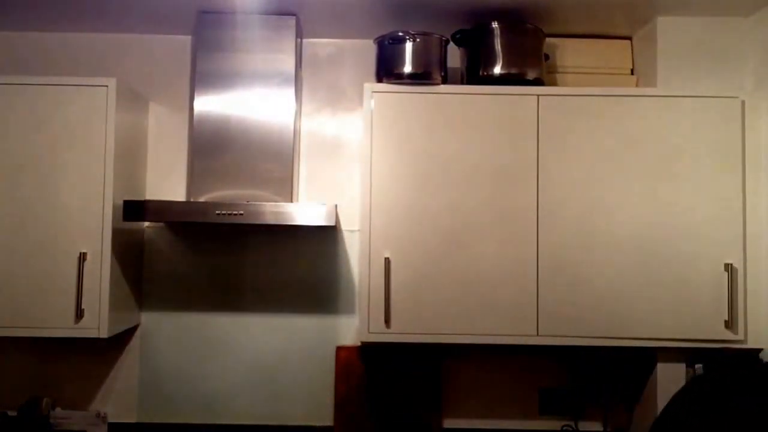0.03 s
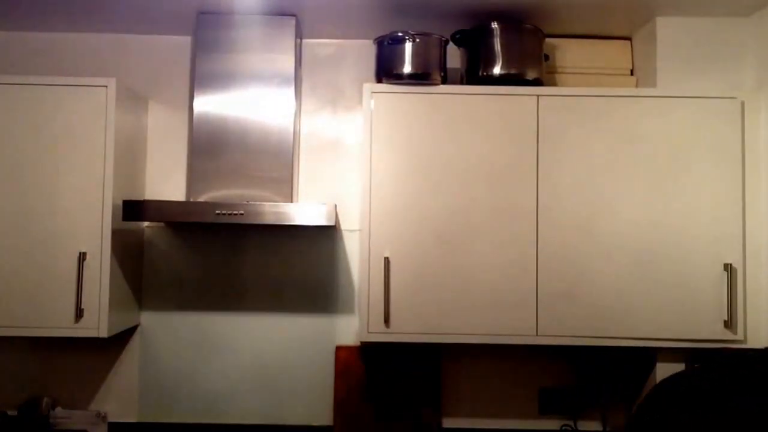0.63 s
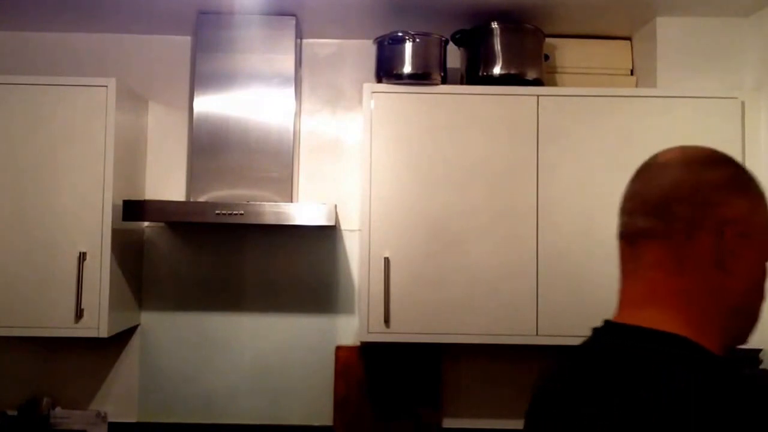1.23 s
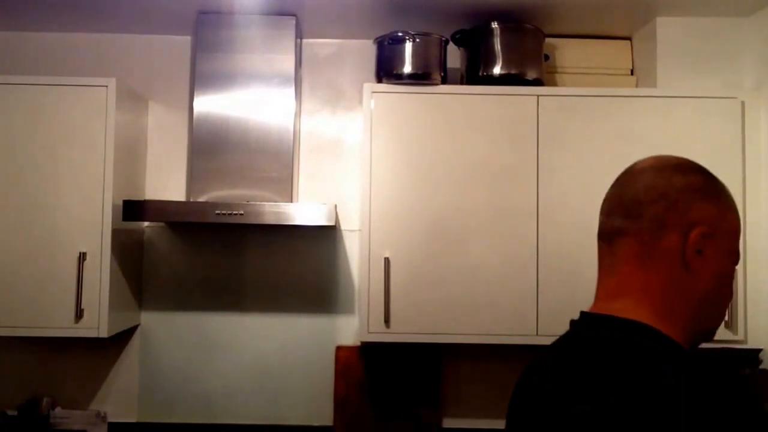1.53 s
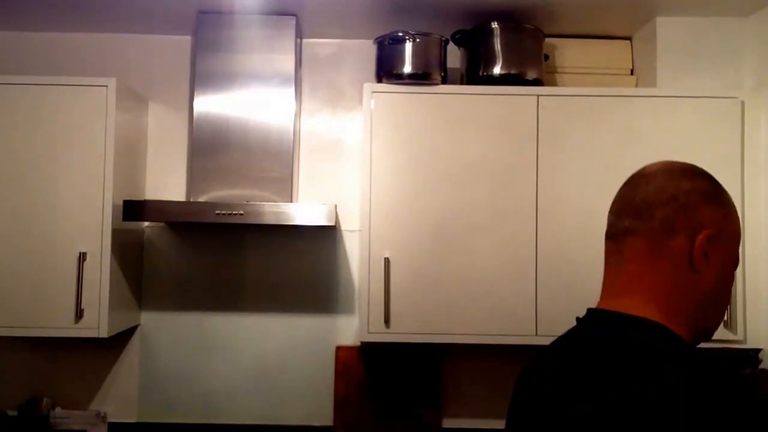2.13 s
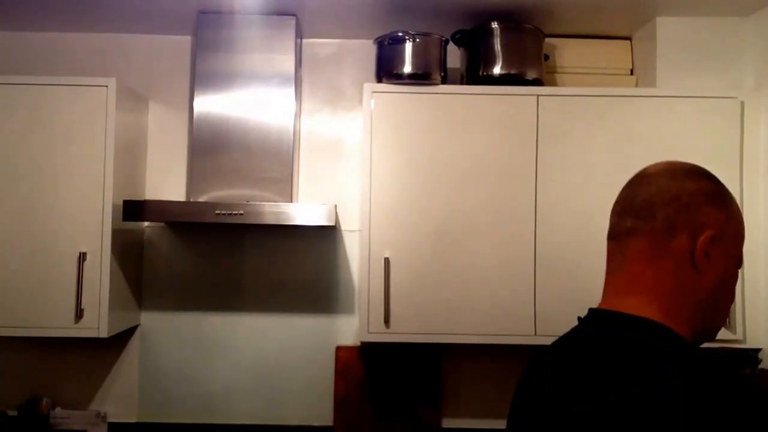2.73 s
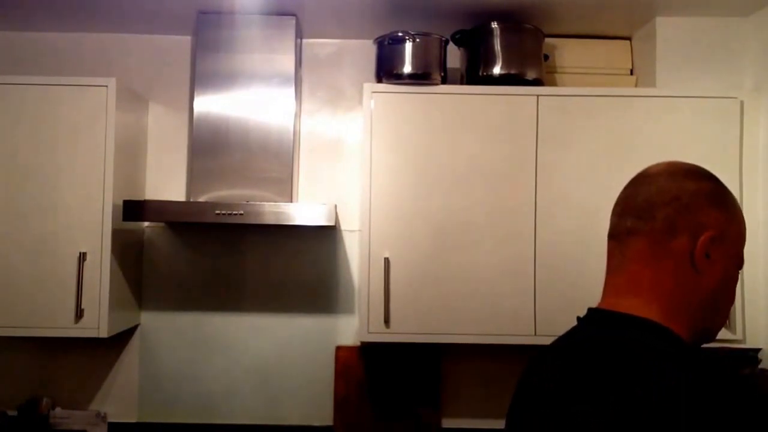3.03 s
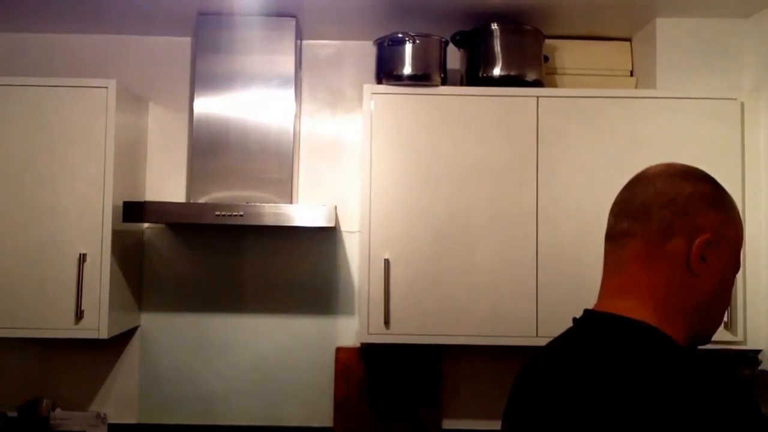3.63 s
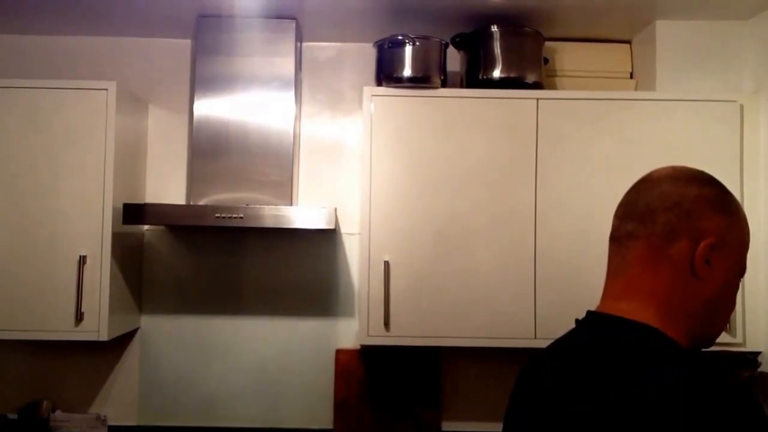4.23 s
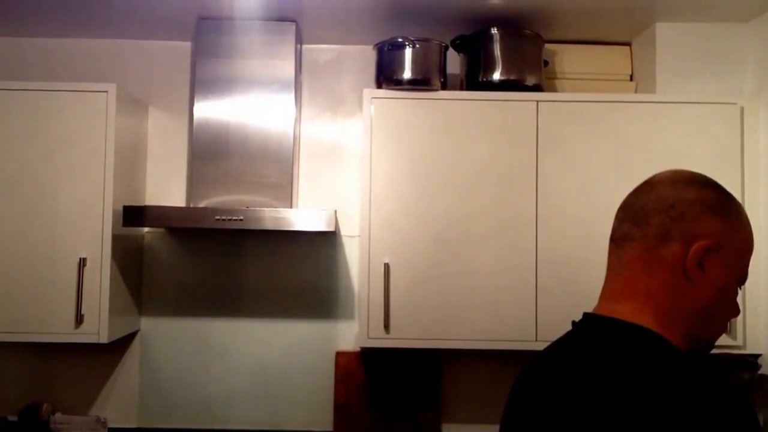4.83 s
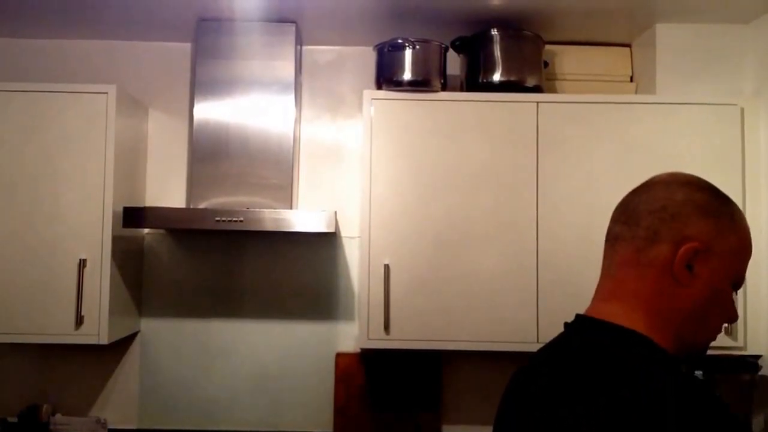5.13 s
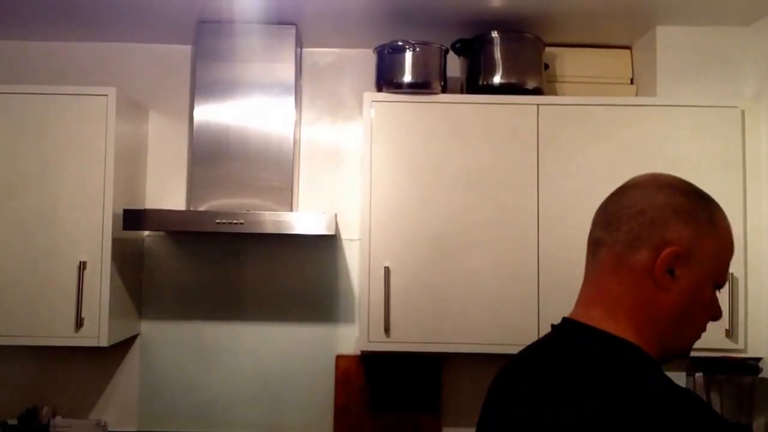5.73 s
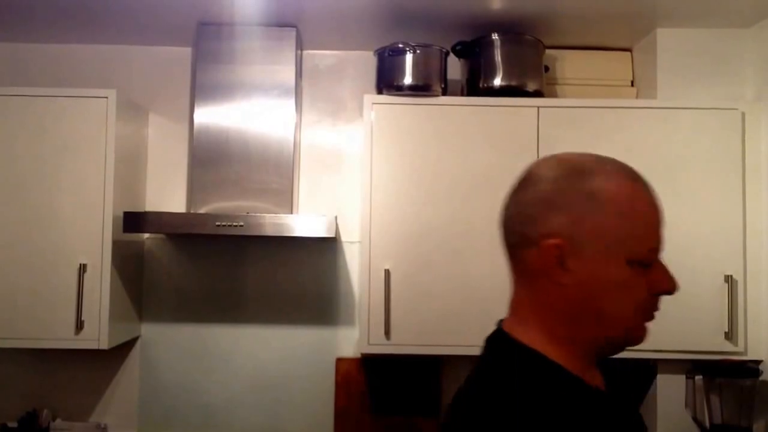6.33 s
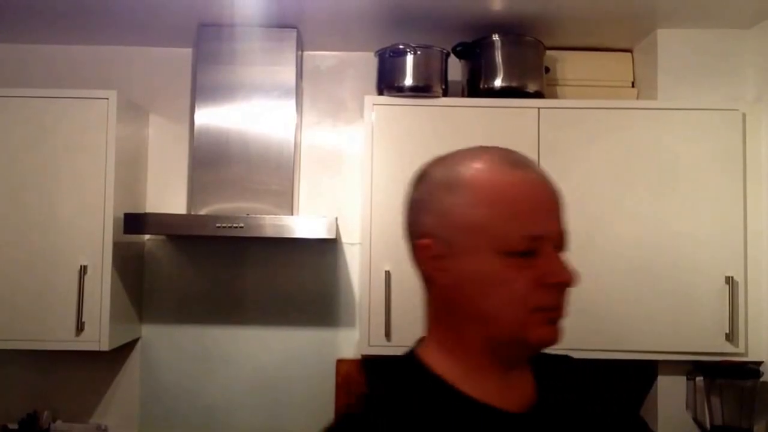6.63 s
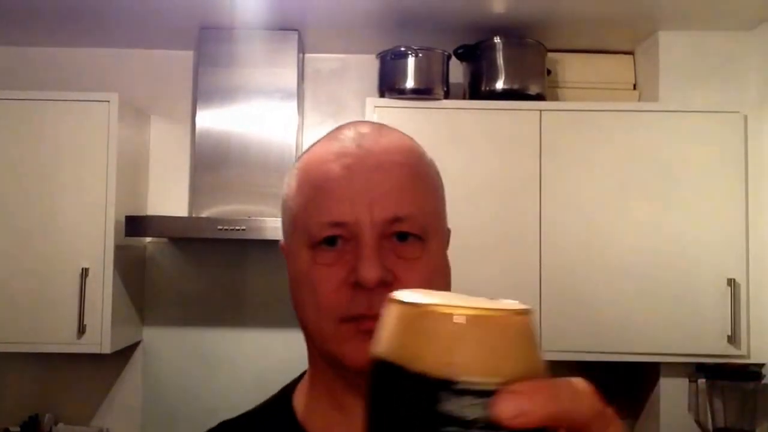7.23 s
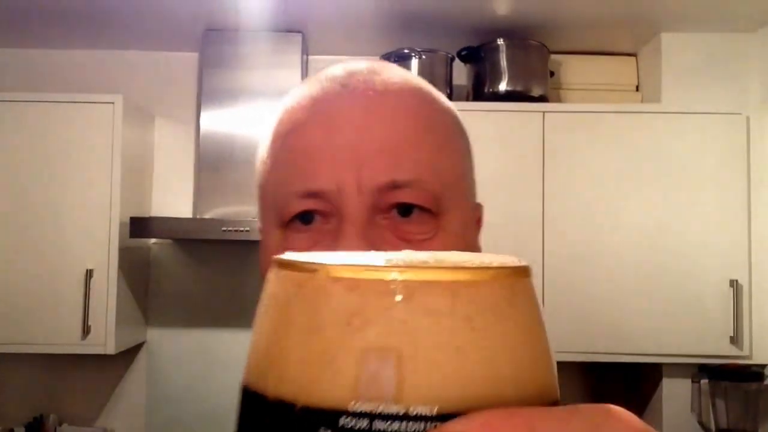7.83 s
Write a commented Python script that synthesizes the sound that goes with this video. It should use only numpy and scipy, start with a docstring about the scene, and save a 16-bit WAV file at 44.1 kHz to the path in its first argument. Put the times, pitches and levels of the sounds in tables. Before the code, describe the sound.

In a small, hard-walled kitchen, cutlery crashes about in a drawer, which knocks, leaving a faint metal tone over a few soft steps. A thin tin is worked at with light clicks and four snapping, scraping pulls. A utensil clinks three times against a glass, the drawer knocks and something is put down with a clatter. Rustling clothes and soft steps follow, all heard from a few metres away.

```python
"""In a small hard-walled kitchen, cutlery crashes about in a drawer, which knocks; a faint metal tone
hangs on over a few soft steps. From 2 s a thin tin is worked at with light clicks and four pulls that
snap, slip and let go. From 5.4 s a utensil clinks three times against a glass, the drawer knocks and
something is put down with a clatter. Rustling clothes and soft steps follow. All is heard from a few
metres off, mostly as room sound. Each hit is a burst of noise that rings a thing's own notes (modes)."""
import sys
import numpy as np
from scipy import signal
from scipy.fft import rfft, irfft
from scipy.io import wavfile

SR = 44100
rng = np.random.default_rng(int(sys.argv[2]) if len(sys.argv) > 2 else 0)


def unload_wav(signal):
    """Save mono or channel-first audio to the path in sys.argv[1] as 16-bit WAV at rate SR, clipped to [-1, 1]."""
    wavfile.write(
        sys.argv[1],
        SR,
        np.round(np.clip(np.atleast_2d(signal).T, -1, 1) * 32767).astype(np.int16),
    )


N = 356195
AGE = np.arange(SR) / SR  # seconds since a hit; each lasts one second
HZ = np.arange(SR // 2 + 1.0) + 1e-3  # the frequencies in a one-second sound

# Cutlery hits: start_s, bass_db, middle_db, treble_db, rattle_s, ring_share, favoured_hz
CUTLERY_HITS = [(0.007, -37, -33.5, -32, 0.28, 0.074, 12350.0),
                (0.032, -27, -23.5, -18, 0.069, 0.22, 9165.0),
                (0.062, -30.5, -28.5, -29, 0.24, 0.13, 1603.0),
                (0.221, -42.5, -35.5, -34, 0.14, 0.078, 9165.0), (0.41, -45, -40, -54.5, 0.17, 1, 11190.0),
                (0.505, -30.5, -28.5, -24, 0.14, 0.28, 900.0)]


def cutlery():
    """Pieces of metal crash together, rattle and ring."""
    # Tone of the clatter: frequency_hz, level_db
    colour = [(35, -60), (60, -30), (120, -17), (190, -13.5), (240, -10.5), (282, -9.5), (339, -3),
              (577, -8.5), (875, -14.5), (1830, -10.5), (2110, -5), (2700, -12), (3600, -13), (5000, -19),
              (9020, -15), (9670, -17), (15000, -12.5)]
    # Ringing notes: pitch_hz, level_db, width_hz
    modes = [(247, -8, 26), (343.5, -0.5, 30), (906, -1.5, 56), (1594, -5.5, 14), (2200, -8, 43),
             (5590, -10, 7), (6000, -8, 22), (8950, -9.5, 14), (9280, -9, 15), (10660, -1, 78),
             (11360, -4, 24), (12530, 0, 89), (13730, -2, 69), (14830, 1.5, 30)]
    room = kitchen(direct_share=0.17)
    return struck(CUTLERY_HITS, colour, modes, room, crack=0.08, grain_db=5.5, vary_db=3, favour_db=7)


def tin_pulls():
    """Each pull starts with a bright snap, slips twice with a duller scrape and lets go with a ring."""
    # Pulls: start_s, length_s, snap_db, slip_db, release_db, extra_treble_db, ring_freedom (0-1)
    pulls = [(2.493, 0.052, -73.5, -72.5, -74, -1, 0.05), (2.762, .08, -67, -55, -51.5, 6, 0.63),
             (3.554, .24, -42, -48, -44.5, 3.5, 0.66), (4.344, .183, -45, -44.5, -42, -0.5, 0.93)]
    # Stages of a pull: bass_offset_db, treble_offset_db, rattle_s, ring_weight, favoured_hz
    snap = (-24.5, 3, 0.04, 0.38, 5490)
    slip = (-19.5, -11.5, 0.14, 0.8, 2350)
    release = (-18.5, -7, 0.035, 1.16, 2460)
    # Tone of the thin metal: frequency_hz, level_db
    colour = [(100, -29), (450, -19.5), (900, 2.5), (1400, -4.5), (1750, -2.5), (2500, 8.5), (3200, 4),
              (4100, 3.5), (5000, 4), (6500, 5), (8000, -0.5), (15000, -4.5)]
    # Ringing notes: pitch_hz, level_db, width_hz
    modes = [(1190, -6, 29), (2121, -2.5, 31), (2346, -4, 35.5), (2427, 1, 50), (2610, -8.5, 120),
             (3780, -13, 70), (5490, -3, 38), (7340, -9.5, 108), (8960, -8, 71), (10970, -22, 50),
             (12200, -11, 48), (13900, -14, 150)]
    hits = []
    for start_s, length_s, snap_db, slip_db, release_db, bright_db, freedom in pulls:
        stages = [(snap, 0, snap_db, 0), (slip, 0.31, slip_db, bright_db),
                  (slip, 0.62, slip_db, bright_db), (release, 1, release_db, bright_db)]
        for (bass, treble, rattle_s, ring, hz), progress, db, extra_db in stages:
            hit_s = start_s + progress * length_s
            hits.append((hit_s, db + bass, db, db + treble + extra_db, rattle_s, ring * freedom, hz))
    room = kitchen(direct_share=0.28)
    return struck(hits, colour, modes, room, crack=0.027, grain_db=3.5, vary_db=3, favour_db=3.5)


def glass_clinks():
    """A utensil hits a glass and bounces once, more weakly, on the same spot."""
    # Clinks: start_s, bass_db, middle_db, treble_db, favoured_hz
    clinks = [(5.414, -46, -34.5, -24.5, 13170), (5.602, -49, -36, -27, 10490),
              (5.906, -43.5, -36, -35.5, 3435)]
    # Tone of the tap: frequency_hz, level_db
    colour = [(100, -9.5), (380, 5), (950, 0.5), (1400, -2), (2200, 2.5), (3600, 2), (4500, 5), (5400, 0.5),
              (6200, -3), (7800, -1), (9300, 0.5), (11000, 2.5), (15000, -2)]
    # Ringing notes: pitch_hz, level_db, width_hz
    modes = [(1846, -17, 35), (3000, -14, 50), (3435, -9, 35), (4270, -7, 110), (4668, -13, 90),
             (7097, -3, 32), (7190, -7, 70), (8130, -9, 150), (10490, -9, 40), (13170, -8, 50)]
    rattle_s, ring_share, bounce_s, bounce_loss_db = 0.05, 0.49, 0.031, 9.5
    hits = [(start_s + lag_s, bass - loss, middle - loss, treble - loss, rattle_s, ring_share, hz)
            for start_s, bass, middle, treble, hz in clinks
            for lag_s, loss in ((0, 0), (bounce_s, bounce_loss_db))]
    room = kitchen(direct_share=0.22)
    return struck(hits, colour, modes, room, crack=0.21, grain_db=9, vary_db=1.5, favour_db=6)


def put_down():
    """Something is set down and clatters in four quick hits."""
    # Hits: start_s, bass_db, middle_db, treble_db, rattle_s, ring_share
    hits = [(6.135, -39.5, -39.0, -43.5, 0.17, 0.08), (6.188, -43, -37.5, -42.5, 0.021, 0.3),
            (6.219, -34, -32, -34, 0.057, 0.53), (6.3, -46, -40.5, -47.5, 0.17, 0.28)]
    # Tone of the clatter: frequency_hz, level_db
    colour = [(40, -35), (100, -15), (280, -4), (700, -5), (1200, -8), (2000, -2), (5000, -10),
              (8000, -11.5), (12000, -16.5), (15000, -23)]
    # Ringing notes: pitch_hz, level_db, width_hz
    modes = [(463, 0.5, 14), (1610, 2.5, 69), (2760, 12, 110), (3400, 4, 90), (4520, 9, 600),
             (5540, -3, 200), (7500, -11, 41)]
    return struck(hits, colour, modes, kitchen(direct_share=0.25), crack=0.16, grain_db=6.5, vary_db=2.5)


def drawer_knocks():
    """The drawer knocks with low notes that die quickly."""
    # Knocks: start_s, bass_db, middle_db, treble_db, rattle_s, ring_share
    hits = [(0.314, -30.5, -31, -42, 0.13, 0.6), (5.696, -34, -42, -69, 0.05, 0.56),
            (5.712, -36, -60, -77, 0.012, 0), (6.345, -39, -49, -69, 0.052, 0.07)]
    # Tone of the knock: frequency_hz, level_db
    colour = [(29, -59), (50, -21), (313, -10), (462, 0.5), (540, -8), (780, -5.5), (1240, -10.5),
              (1600, -9.5), (1750, -10), (2470, -11), (3100, -23), (12000, -30.5), (15600, -54),
              (22000, -120)]
    # Ringing notes: pitch_hz, level_db, width_hz
    modes = [(316, -12, 23), (388, -5.5, 42), (511.3, -8.5, 17), (767, -8.5, 115)]
    return struck(hits, colour, modes, kitchen(direct_share=0.41), crack=0.3, grain_db=1, vary_db=3)


def light_clicks():
    """A handled thing clicks: the tighter it is held, the more it thuds and the less it rings."""
    # Clicks: start_s, level_db, grip (0 loose, 1 tight)
    clicks = [(2.019, -57, 0), (2.323, -55, 0.28), (3.1718, -59, 0.91), (4.104, -73, 1), (4.165, -65, 1),
              (4.885, -68, 0.6), (5.146, -74, 0.97), (5.364, -66.5, 0.8)]
    # Tone of the click: frequency_hz, level_db
    colour = [(100, -24), (800, 6), (1300, -1), (2400, 2.5), (6500, -4.5), (15000, -7)]
    # Ringing notes: pitch_hz, level_db, width_hz
    modes = [(970, -2.5, 59), (3000, -12.5, 120), (3530, -5, 53), (4000, 1, 440), (6910, -6.5, 290),
             (8980, -9, 230), (11000, -12.5, 60)]
    rattle_s, loose_ring_share = 0.047, 0.9
    hits = []
    for start_s, db, grip in clicks:
        bass_db = db + np.interp(grip, [0, 1], [-18, -1])
        treble_db = db + np.interp(grip, [0, 1], [2.5, -1.5])
        hits.append((start_s, bass_db, db, treble_db, rattle_s, loose_ring_share * (1 - grip)))
    return struck(hits, colour, modes, kitchen(direct_share=0.39), crack=0.029, grain_db=6.5, vary_db=3)


def struck(hits, colour, modes, room, crack, grain_db, vary_db, favour_db=0):
    """Each hit makes a clatter and rings clear notes; the spot that is hit may favour one note."""
    body = dense_resonances(colour)
    responses = np.array([resonator(hz, width) for hz, _, width in modes])
    mode_hz, mode_db, _ = np.transpose(modes)
    mode_power, out = np.abs(responses) ** 2, np.zeros(N)
    for start_s, bass, middle, treble, rattle_s, ring_share, *favoured in hits:
        drive = contact(rattle_s, crack, grain_db) * room
        hit_db = mode_db + vary_db * rng.standard_normal(len(modes))
        for hz in favoured:
            hit_db[np.argmin(np.abs(mode_hz - hz))] += favour_db
        energy_taken = mode_power @ np.abs(drive) ** 2
        strengths = from_db(hit_db) * rng.choice([-1, 1], len(modes)) / np.sqrt(energy_taken)
        ring, clatter = unit(drive * (strengths @ responses)), unit(drive * body)
        ring_share = min(ring_share, 0.95)  # some clatter always remains
        mix = np.sqrt(ring_share) * ring + np.sqrt(1 - ring_share) * clatter
        add(out, start_s, set_bands(mix, [bass, middle, treble]))
    return out


def contact(rattle_s, crack, grain_db):
    """Spectrum of a first crack and a dying shower of small bounces, made uneven by grain_db."""
    grain_times = AGE[::64]
    grains = from_db(grain_db * np.interp(AGE, grain_times, rng.standard_normal(len(grain_times))))
    swell_s = 0.0044 + 0.5 * rattle_s ** 2  # long slides start more gently than taps
    bounces = unit(rng.standard_normal(SR) * grains * fade(rattle_s) * (1 - fade(swell_s)))
    first = unit(rng.standard_normal(SR) * fade(0.04) * (1 - fade(0.011)))
    crack_share = crack / (1 + (rattle_s / 0.12) ** 2)  # a slide hardly cracks
    return rfft(np.sqrt(crack_share) * first + np.sqrt(1 - crack_share) * bounces)


def resonator(hz, width_hz):
    """Filter for one ringing note: the narrower its width, the longer it rings."""
    radiation = (1j * HZ / (1j * HZ + hz / 2)) ** 2  # small things give out little far below their note
    return radiation / (1 + 1j * (HZ ** 2 - hz ** 2) / (HZ * width_hz))


def dense_resonances(colour, uneven_db=2.5, spacing_hz=140):
    """Hundreds of overlapping notes leave peaks and dips in a thing's tone, deepest in the treble."""
    knots = np.arange(0, SR / 2, spacing_hz)
    ripple = np.interp(HZ, knots, rng.standard_normal(len(knots))) * HZ / (HZ + 1500)
    return causal(from_db(at_hz(colour, HZ) + uneven_db * ripple))


def set_bands(spectrum, levels_db):
    """The hardness and weight of a hit set its bass, middle and treble; returns the wave."""
    # Bass, middle and treble ranges: low_hz, high_hz
    bands = [(100, 900), (900, 5000), (5000, 15400)]
    corners = np.log([650, 1200, 4000, 6200])
    power, gain = np.abs(spectrum) ** 2, np.ones(len(HZ))
    for _ in range(2):
        # each band's level, as if its energy were spread over 0.1 s
        rms = np.array([np.sqrt(20 * np.sum((power * gain ** 2)[lo:hi])) / SR for lo, hi in bands])
        bass, middle, treble = np.log(from_db(levels_db) / rms)
        gain *= np.exp(np.interp(np.log(HZ), corners, [bass, middle, middle, treble]))
    return irfft(spectrum * causal(gain))


def footsteps(heel_s=0.23, sole_s=0.38, sole_lag_s=0.048):
    """A soft heel thuds, then the sole scuffs on the floor; nothing rings."""
    # Steps: start_s, heel_db, sole_db
    steps = [(0.794, -55.5, -57.5), (0.955, -53.5, -68.5), (1.11, -68.5, -63.5), (6.581, -59.5, -69),
             (6.935, -58.5, -68), (6.991, -52.5, -61), (7.157, -47.5, -51.5), (7.878, -45, -51.5)]
    # Tone of shoe on floor: frequency_hz, level_db
    colour = [(35, -38), (60, -31.5), (129, -28), (309, -7.5), (347, -10), (390, -8.5), (551, -11.5),
              (938, -15.5), (2010, -4), (3120, -15), (3750, -14), (5680, -19), (15000, -22.5)]
    floor = causal(from_db(at_hz(colour, HZ))) * kitchen(direct_share=0.65)
    out = np.zeros(N)
    for start_s, heel_db, sole_db in steps:
        heel = unit(contact(heel_s, crack=0.29, grain_db=1.5) * floor)
        sole = unit(contact(sole_s, crack=0.29, grain_db=1.5) * floor)
        add(out, start_s, set_bands(heel, [heel_db, heel_db - 14, heel_db - 24]))
        add(out, start_s + sole_lag_s, set_bands(sole, [sole_db - 1.5, sole_db, sole_db - 7.5]))
    return out


def clothes(flutter_db=3.5, fold_s=0.037):
    """Cloth rubs on cloth, unevenly from fold to fold, as the walker turns and comes near."""
    # Loudness of the rustle: time_s, level_db
    loudness = [(6.45, -62), (6.6, -67.5), (6.9, -63), (7.12, -67), (7.26, -56), (7.4, -53), (7.55, -67.5),
                (7.71, -60), (7.83, -66), (8.08, -62.5)]
    # Tone of the rustle: frequency_hz, level_db
    colour = [(60, -23), (200, -2.5), (380, 3.5), (900, -7), (2000, -5), (5000, -16), (15000, -18)]
    t, folds = np.arange(N) / SR, np.arange(0, N / SR, fold_s)
    rub = noise(colour)
    flutter = np.interp(t, folds, rng.standard_normal(len(folds)))
    level_db = np.interp(t, *np.transpose(loudness), left=-np.inf)
    return rub * from_db(level_db + flutter_db * flutter)


def lingering_tone(start_s, damped_at_s=1.98, pitch_hz=329, level_db=-67.5, ring_s=20):
    """A faint low metal tone hangs on after the crash until it is damped."""
    t = np.arange(N) / SR
    fallen_db = 60 * np.maximum(t - start_s, 0) / ring_s + 120 * np.maximum(t - damped_at_s, 0)
    return from_db(level_db - fallen_db) * (t > start_s) * np.sin(2 * np.pi * pitch_hz * t)


def kitchen(direct_share, build_s=0.016):
    """Filter for one spot in the room: the direct sound, then echoes that thicken and die away."""
    # Time for echoes to fall by 60 dB: frequency_hz, decay_s
    decays = [(150, 0.57), (400, 0.36), (1000, 0.47), (3000, 0.4), (7000, 0.44), (15000, 0.25)]
    echoes = rfft(rng.standard_normal(SR) * (rng.random(SR) < 0.04 + AGE / build_s) * (AGE > 0.002))
    centres = np.log([hz for hz, _ in decays])
    tail = sum(irfft(echoes * np.interp(np.log(HZ), centres, band)) * fade(decay_s)
               for band, (_, decay_s) in zip(np.eye(len(centres)), decays))
    return np.sqrt(direct_share) + np.sqrt(1 - direct_share) * rfft(unit(tail))


def air(level_db=-70):
    """Steady room rumble and microphone hiss."""
    # Tone of the background: frequency_hz, level_db
    colour = [(25, -11), (60, -11.5), (140, -14), (330, -9), (600, -15.5), (1200, -23.5), (2500, -27),
              (5000, -31), (15000, -31.5)]
    return from_db(level_db) * noise(colour)


def noise(colour):
    """Steady noise with the given tone and an average (rms) level of 1."""
    hz = np.maximum(np.arange(N // 2 + 1) * SR / N, 1)
    spectrum = rfft(rng.standard_normal(N)) * from_db(at_hz(colour, hz))
    return np.sqrt(N) * unit(irfft(spectrum, N))


def causal(gain):
    """Filter with the given gains in which nothing sounds before its cause (minimum phase)."""
    cepstrum = irfft(np.log(gain + 1e-9))
    cepstrum[1:SR // 2] *= 2
    cepstrum[SR // 2 + 1:] = 0
    return np.exp(rfft(cepstrum))


def from_db(db):
    """Turn decibels into a gain."""
    return 10 ** (np.asarray(db) / 20)


def at_hz(points, hz):
    """Read between a table's rows, giving each octave equal room."""
    frequencies, values = np.transpose(points)
    return np.interp(np.log(hz), np.log(frequencies), values)


def unit(x):
    """Scale a wave or a spectrum to energy 1."""
    return x / np.sqrt(np.sum(np.abs(x) ** 2) + 1e-30)


def fade(decay_s):
    """A one-second curve that falls by 60 dB every decay_s."""
    return np.exp(-np.log(1000) * AGE / decay_s)


def add(out, start_s, sound):
    """Mix in a one-second sound."""
    start = round(start_s * SR)
    out[start:start + SR] += sound[:N - start]


def scene():
    """Things sound from their own spots in the kitchen, mixed into one channel."""
    things = cutlery() + light_clicks() + tin_pulls() + glass_clinks() + put_down() + drawer_knocks()
    tone = lingering_tone(start_s=CUTLERY_HITS[-1][0])
    return (things + tone + footsteps() + air() + clothes())[None]


def record(dry, bass_cut_hz=38, peak_limit=0.65, top_cut_hz=15350):
    """The small microphone loses the deep bass, rounds the loudest peaks and cuts the top steeply."""
    thin = signal.sosfilt(signal.butter(4, bass_cut_hz, "high", fs=SR, output="sos"), dry)
    rounded = peak_limit * np.tanh(thin / peak_limit)
    return signal.sosfilt(signal.ellip(12, 0.1, 80, top_cut_hz, fs=SR, output="sos"), rounded)


dry = scene()
out = record(dry)
unload_wav(out)
```